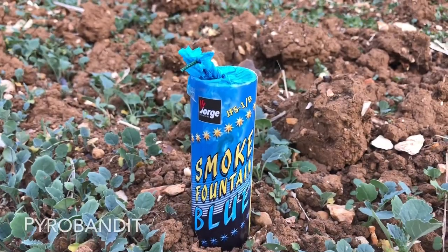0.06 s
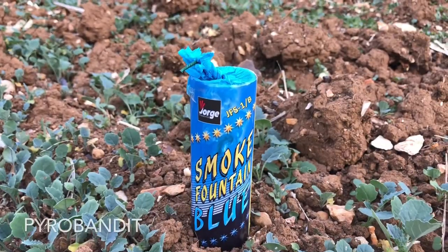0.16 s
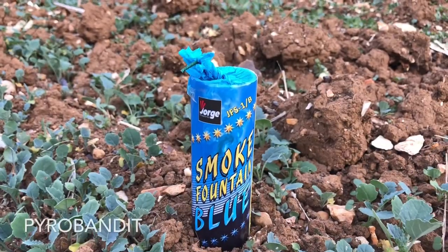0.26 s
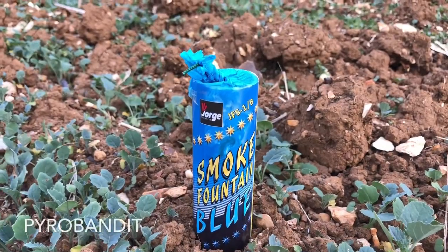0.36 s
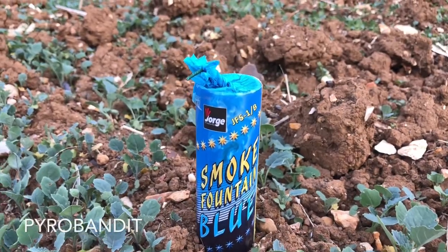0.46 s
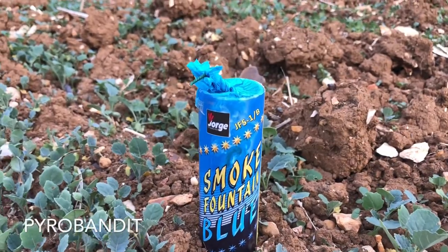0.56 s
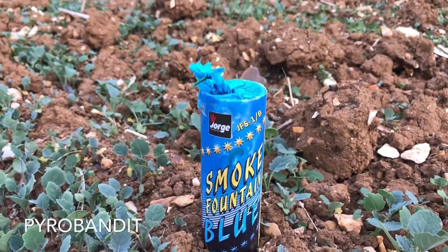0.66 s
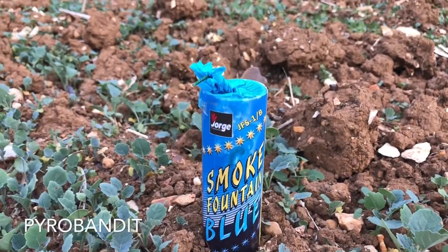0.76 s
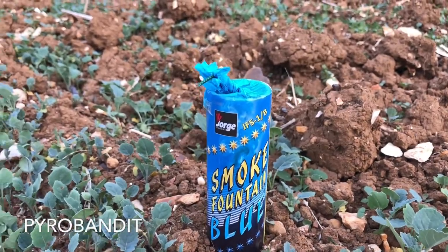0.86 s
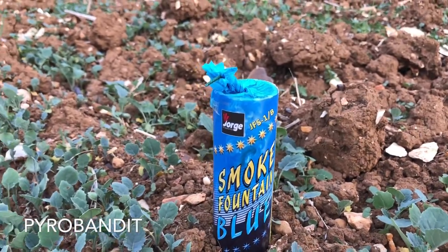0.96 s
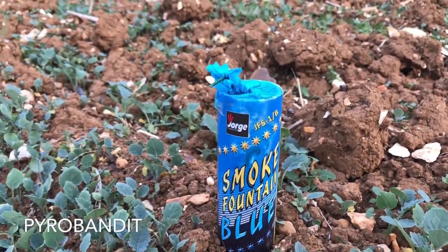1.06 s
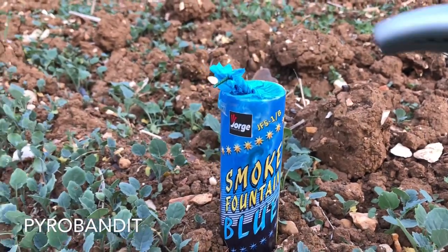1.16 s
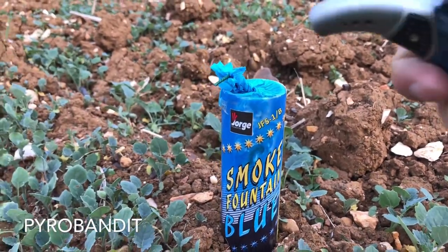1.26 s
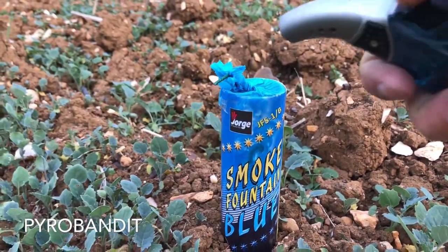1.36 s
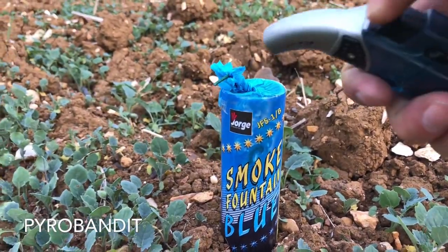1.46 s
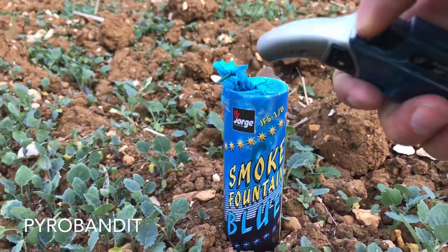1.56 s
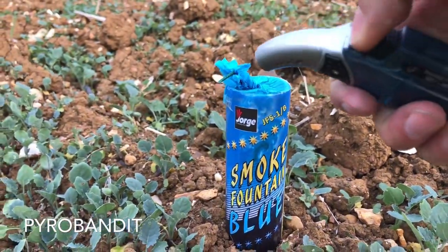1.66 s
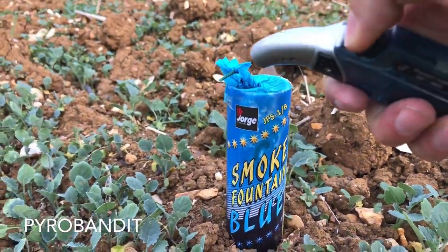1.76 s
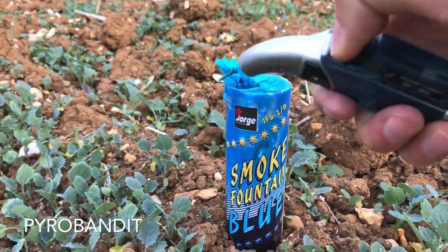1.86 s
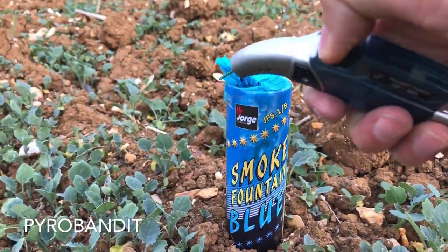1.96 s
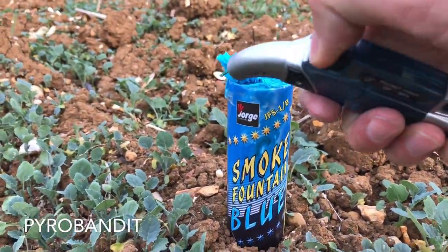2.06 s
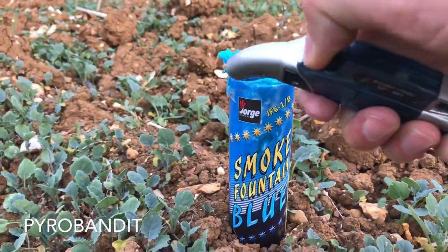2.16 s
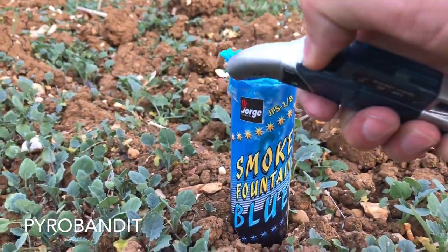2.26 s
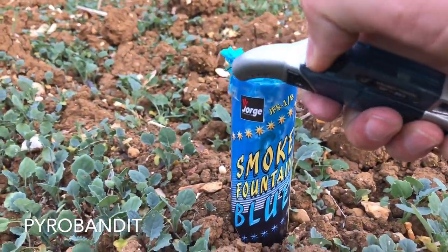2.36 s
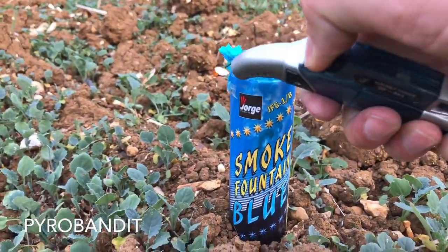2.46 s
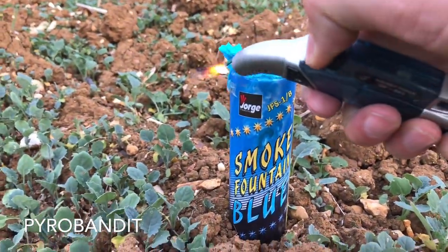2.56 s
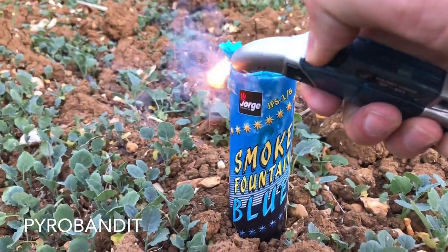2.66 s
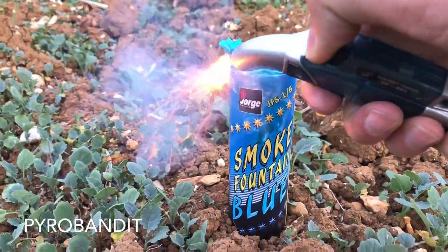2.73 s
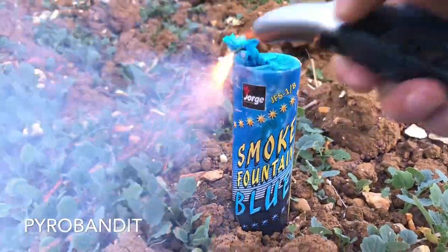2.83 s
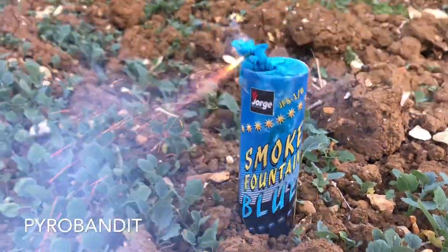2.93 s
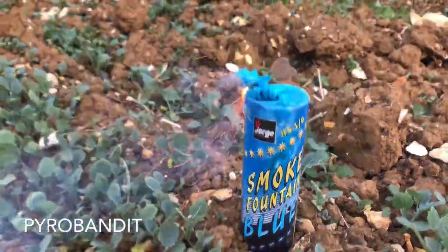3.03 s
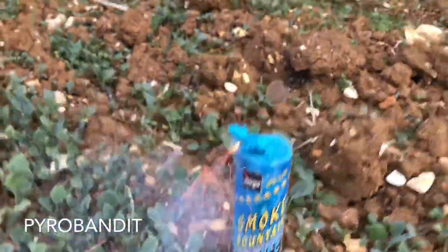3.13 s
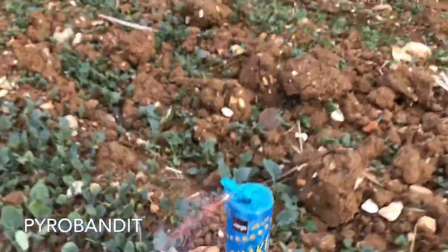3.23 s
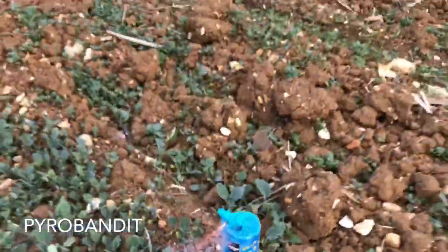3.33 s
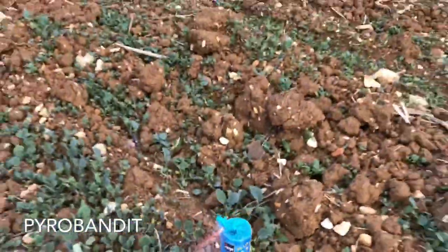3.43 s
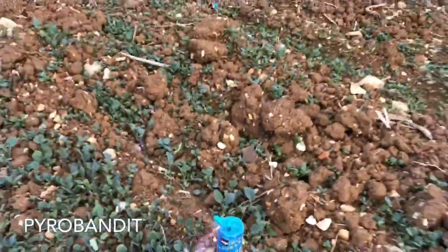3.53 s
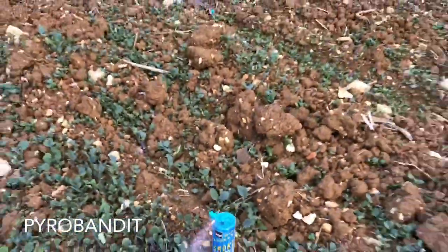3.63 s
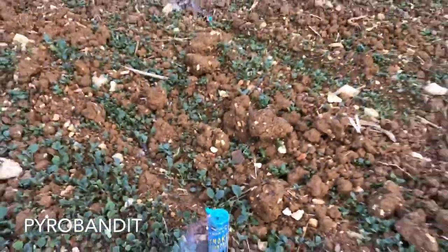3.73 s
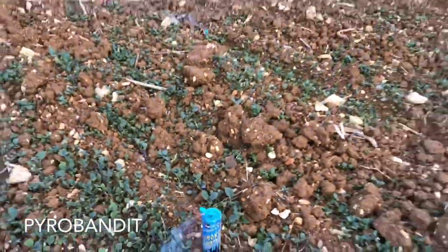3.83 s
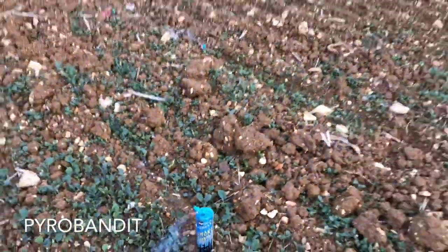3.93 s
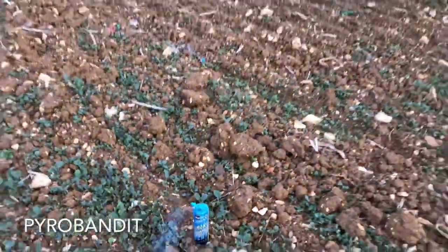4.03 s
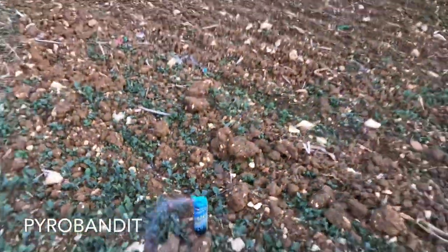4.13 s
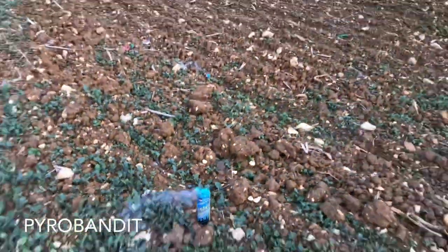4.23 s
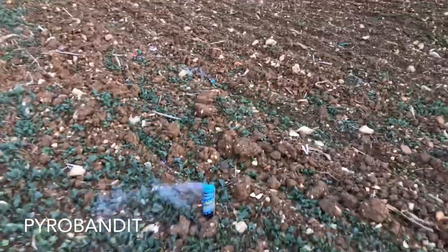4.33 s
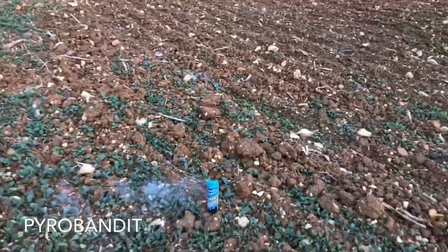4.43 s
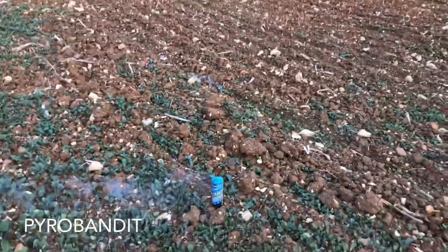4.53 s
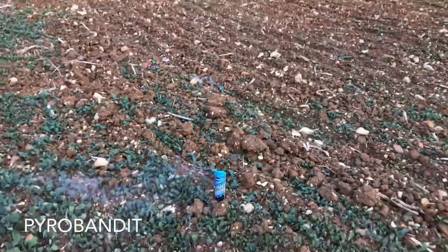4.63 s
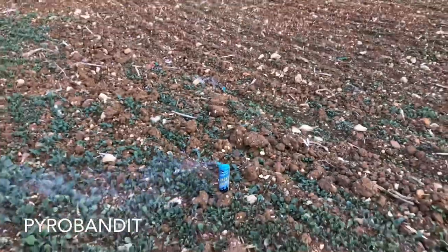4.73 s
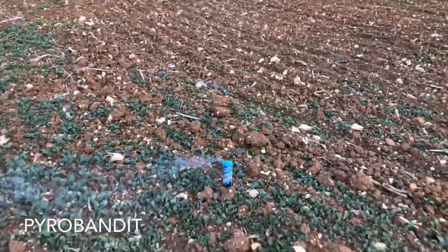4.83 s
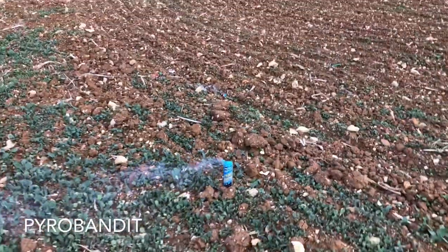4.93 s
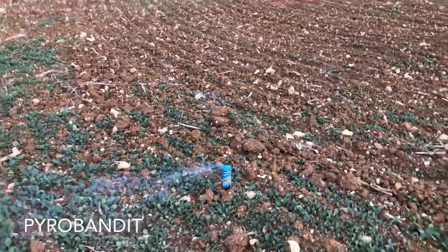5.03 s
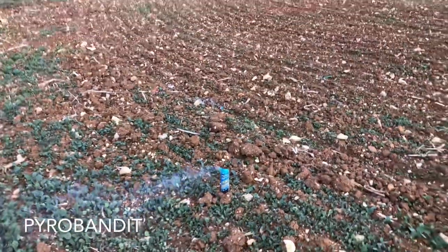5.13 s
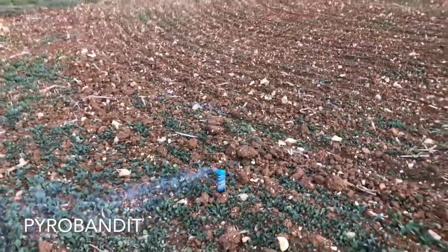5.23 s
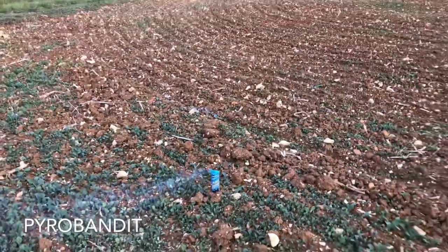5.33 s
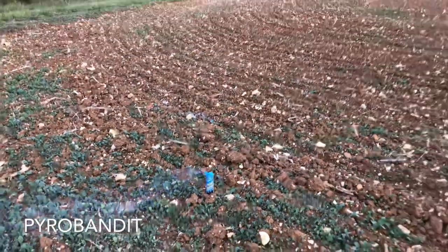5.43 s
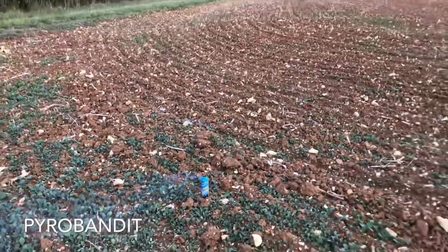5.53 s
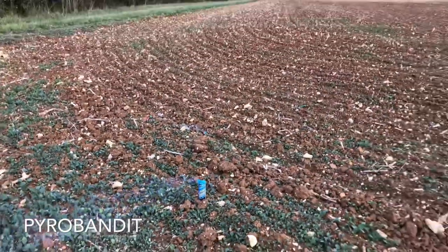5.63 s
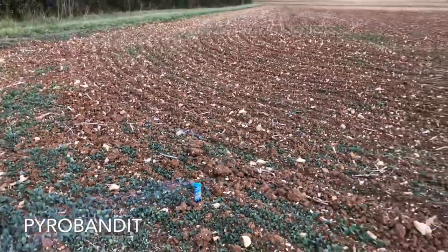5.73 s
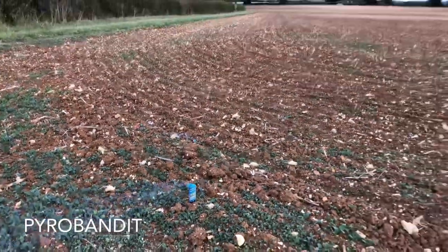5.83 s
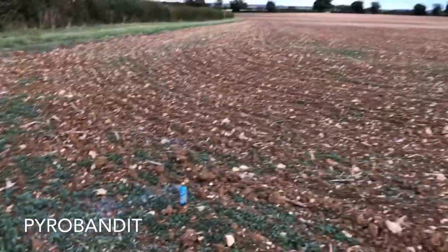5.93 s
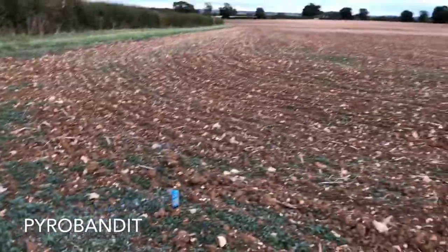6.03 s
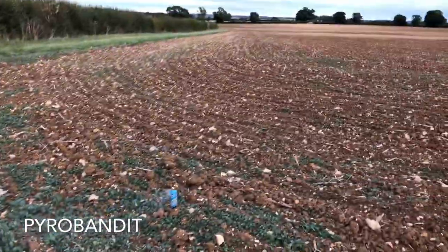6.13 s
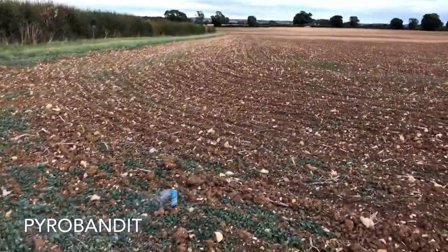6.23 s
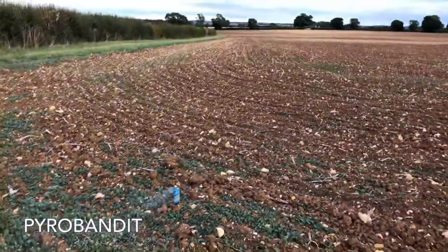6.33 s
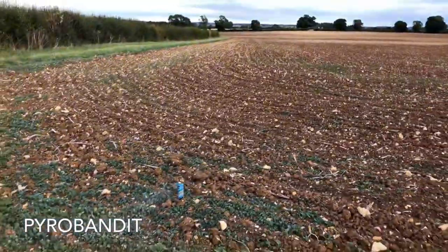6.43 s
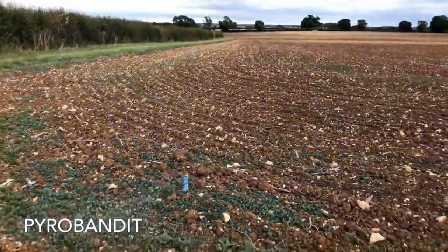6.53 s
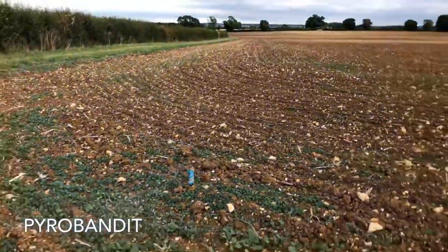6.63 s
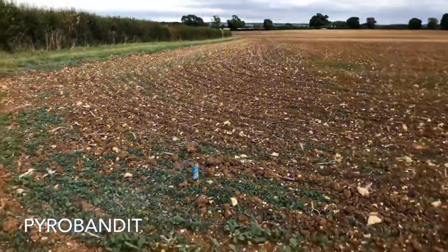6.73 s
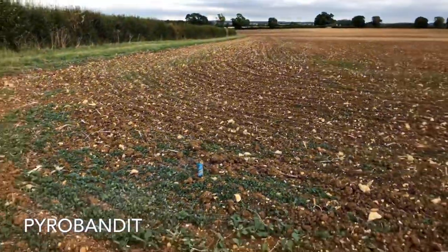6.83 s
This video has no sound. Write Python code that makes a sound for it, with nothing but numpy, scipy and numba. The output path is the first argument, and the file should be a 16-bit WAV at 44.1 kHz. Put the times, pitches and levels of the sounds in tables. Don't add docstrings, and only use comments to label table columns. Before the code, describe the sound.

In an open field, a torch lighter snaps alight, a firework fuse bursts into spitting hiss, then thins behind crunching retreating steps and gusty rumble.

```python
import sys
import numpy as np
from scipy import signal
from scipy.fft import rfft, irfft, next_fast_len
from scipy.io import wavfile
from scipy.ndimage import uniform_filter1d, map_coordinates
from numba import njit

SR = 44100
rng = np.random.default_rng(int(sys.argv[2]) if len(sys.argv) > 2 else 0)


def linear_from_db(decibels):
    return 10 ** (np.asarray(decibels, float) / 20)


def unload_wav(signal):
    wavfile.write(
        sys.argv[1],
        SR,
        np.round(np.clip(np.atleast_2d(signal).T, -1, 1) * 32767).astype(np.int16),
    )


N = 303804
T = np.arange(N) / SR


def curve(rows, fade_in=.005, fade_out=.01):
    s, *columns = np.transpose(rows)
    opening = np.clip((T - s[0]) / fade_in + 1, 0, 1)
    closing = np.clip((s[-1] - T) / fade_out + 1, 0, 1)
    return [opening * closing] + [np.interp(T, s, column) for column in columns]


def swells(rows):
    return sum(height * np.exp(-((T - s) / width) ** 2) for s, height, width in rows)


def walk(rate):
    hold = int(SR / rate)
    steps = np.repeat(rng.standard_normal(N // hold + 1), hold)
    return 1.35 * uniform_filter1d(uniform_filter1d(steps, hold), hold)[:N]


def grit(share, spread_db, size=16):
    strengths = np.minimum(rng.exponential(size=N // size + 1), 4)
    bursts = rng.standard_normal(N) * linear_from_db(spread_db * np.repeat(strengths, size)[:N])
    return (1 - share) * rng.standard_normal(N) + share * bursts / np.std(bursts)


def filtered(x, tone):
    size = next_fast_len(N)
    hz, db = np.transpose(tone)
    bins_hz = np.arange(size // 2 + 1) * SR / size
    gain = linear_from_db(np.interp(np.log(bins_hz + 1), np.log(hz), db, left=-90, right=-90))
    return irfft(rfft(x, size) * gain, size)[:N]


def colour(x, tone):
    y = filtered(x, tone)
    return y / np.std(y)


def add(out, s, grain):
    i = int(s * SR)
    out[i:i + len(grain)] += grain[:N - i]


def wavelets(rows, cycles, glide, rise):
    out = np.zeros(N)
    phases = rng.random(len(rows))
    for (s, db, hz), phase in zip(rows, phases):
        c = np.arange(int(8 * cycles * SR / hz)) * hz / SR
        shape = (1 - np.exp(-(c / rise) ** 2)) * np.exp(-c / cycles)
        sinking = np.log1p(glide * c) / glide * (1 + glide * rise)
        wave = np.sin(2 * np.pi * (phase + sinking))
        start_s = max(s - shape.argmax() / SR, 0)
        add(out, start_s, linear_from_db(db) * shape / shape.max() * wave)
    return out


def scatter(per_s, gain, hz, octaves, spread_db):
    slot = np.arange(400)
    when, size, pitch = rng.random((len(slot), 3)).T
    s = (slot + when) / per_s
    db = 20 * np.log10(np.interp(s, T, gain) + 1e-9) + spread_db * (2 * size - 1)
    rows = np.transpose([s, db, hz * 2 ** (octaves * (2 * pitch - 1))])
    return rows[(s < T[-1]) & (db > -75)]


def knock(modes, blows, treble_db=0):
    t = np.arange(SR // 40) / SR
    ring = np.zeros(len(t))
    for hz, db, t60 in modes:
        strength = linear_from_db(db + treble_db * np.log2(hz / 4000))
        ring += strength * np.sin(2 * np.pi * hz * t) * 1000. ** (-t / t60)
    ring = sum(size * np.roll(ring, int(ms * SR / 1000)) for ms, size in blows)
    ring = signal.sosfilt(signal.butter(5, 1450, "high", fs=SR, output="sos"), ring)
    return ring / np.abs(ring).max()


@njit
def notch(x, hz, depth, q):
    y, b, l = np.empty(len(x)), 0., 0.
    for i in range(len(x)):
        g = np.tan(np.pi * hz[i] / SR)
        v = (b + g * (x[i] - l)) / (1 + g * (g + 1 / q))
        b, l, y[i] = 2 * v - b, l + 2 * g * v, x[i] - depth[i] * v / q
    return y


def fuse():
    # time_s, level_db
    burning = [(2.56, -56), (2.65, -44), (2.87, -37), (3.03, -35.5), (3.26, -37), (3.54, -41.5),
               (3.76, -47.5), (3.85, -44.5), (4.19, -47.5), (4.32, -53), (4.51, -49), (4.8, -48.5),
               (4.96, -55.5), (5.48, -52.5), (6.04, -53), (6.32, -61.5), (6.5, -54), (6.889, -55)]
    # time_s, change_db, half_width_s
    flares = [(2.935, 5, 0.0079), (3.2, 0, 0.027), (3.575, -1.5, .03), (3.64, 4, 0.054), (3.95, -1, 0.04),
              (5.22, 2, 0.036), (5.55, -5, 0.032), (5.85, -3, 0.13), (3.46, 1.5, .06), (4.75, 1, .04),
              (6.3, 3, 0.066)]
    # pitch_hz, level_db (per Hz)
    roar_tone = [(120, -4), (250, -1.5), (700, -4.5), (1500, -1), (2600, -10.5), (5000, -32)]
    fizz_tone = [(900, -47), (1700, -6), (2500, -1), (3800, 0), (5500, -2), (7500, -6), (12000, -31)]
    spark_tone = [(4000, -16), (6500, -5), (8500, 0.5), (12000, 1), (15500, 3.5), (17000, -34)]
    on, fizz_db = curve(burning, fade_in=.05)
    torched = swells([(2.875, 1, 0.16)])
    in_tube = np.clip((T - 6.04) / 0.025 + 1, 0, 1)
    roar_db = -6 + 5 * torched
    spark_db = 1.5 - 8.5 * torched - 7 * in_tube
    sputter = walk(20.98) + 0.8 * walk(50)
    roar = linear_from_db(roar_db + 0.58 * sputter + 0.28 * walk(17)) * colour(grit(0.2, 6.6), roar_tone)
    fizz = linear_from_db(0.96 * sputter) * colour(grit(0.29, 1.9), fizz_tone)
    sparks = linear_from_db(spark_db + 1.26 * sputter) * colour(grit(0.29, 8.7), spark_tone)
    return on * linear_from_db(fizz_db + swells(flares)) * (roar + fizz + sparks)


def spits():
    # time_s, peak_db, pitch_hz
    cracks = [(1.301, -66, 3500), (1.715, -44, 4000), (1.799, -33, 800), (1.813, -36, 700),
              (1.817, -40, 7000), (1.8215, -36, 6500), (1.951, -32, 7000), (2.05, -45, 4000),
              (3.9973, -21, 8000), (3.9993, -18.5, 8500), (4.0095, -27, 6500), (4.0124, -30, 2470),
              (4.0172, -25, 6000), (4.0202, -27, 4500), (4.024, -17, 9000), (4.025, -35, 3500),
              (4.0374, -20, 5000), (4.0378, -10.5, 12300), (5.946, -37, 6500), (6.061, -40, 5960),
              (6.141, -41, 8960)]
    return wavelets(cracks, cycles=0.75, glide=0.032, rise=0.27)


def lighter_gas():
    # time_s, level_db
    jet_levels = [(1.645, -59), (1.671, -54), (1.771, -54), (1.79, -50)]
    # time_s, level_db
    flame_levels = [(1.812, -43.5), (1.9, -45.5), (2.286, -43.5), (2.502, -48), (2.6, -49)]
    # pitch_hz, level_db (per Hz)
    jet_tone = [(1470, -38), (2500, -13), (4140, -19), (4440, -14), (5350, -11), (5970, -12), (6860, -5),
                (8080, 3), (10400, -7), (16000, -5)]
    flame_tone = [(120, -7), (200, -3), (482, -7.5), (1500, -2.5), (3020, -7), (4040, -5), (4950, -10.5),
                  (8270, -18), (11500, -18.5), (14900, -16), (16000, -12)]
    flame_off_s = 2.925
    _, jet_db = curve(jet_levels)
    until_off = flame_levels + [(flame_off_s, flame_levels[-1][1])]
    lit, flame_db = curve(until_off, fade_in=0.004, fade_out=0.02)
    jet_on = curve([jet_levels[0], (1.8, 0)], fade_in=0.01, fade_out=0.0058)[0]
    jet = jet_on * linear_from_db(jet_db + 1.5 * walk(39.7))
    flame = lit * linear_from_db(flame_db + 1.43 + 1.9 * walk(60) + 0.3 * walk(16))
    return jet * colour(grit(0.08, 3.1), jet_tone) + flame * colour(grit(0.3, 6.2), flame_tone)


def shade(fire):
    # time_s, centre_hz, depth (0 to 1, negative lifts)
    hand = [(1.64, 10500, 0.7), (1.85, 10700, 0.8), (2.0, 10900, 0.76), (2.3, 12300, 0.56),
            (2.45, 11500, 0.2), (2.62, 12200, 0.75), (2.76, 10300, 0.1), (2.92, 9600, 0.55),
            (3.02, 8550, 0)]
    narrow_dip = [(1.82, 4480, 1), (2.2, 5030, 0.6), (2.5, 5730, 0.8), (2.75, 5200, 0.5), (3.1, 5100, 0),
                  (3.3, 4140, 0.1), (3.5, 3950, 0.25), (4.1, 4150, 0.3), (4.4, 4560, 0)]
    mouth = [(1.9, 2900, 0.66), (2.4, 3250, 0.15), (2.8, 3200, 0.4), (2.95, 4200, -0.15), (3.15, 4100, 0),
             (4.9, 3400, 0.12), (5.4, 3387, -0.5), (6.89, 3600, -0.95)]
    for band, sharpness in ((hand, 2.1), (narrow_dip, 6.5), (mouth, 5.5)):
        present, hz, depth = curve(band, fade_out=0.076)
        fire = notch(fire, np.clip(hz, 100, .45 * SR), present * np.clip(depth, -2, 1), sharpness)
    return fire


def over_ground(x):
    # time_s, extra_delay_ms, strength (-1 to 1)
    bounce = [(1.6, .6, .5), (1.9, .56, .55), (2.2, .52, .55), (2.6, .46, .6), (2.8, .46, .6),
              (3.0, .45, .45), (3.2, .5, .5), (3.4, .57, .5), (4.0, .57, .4), (4.2, .57, .6),
              (4.35, .53, .8), (4.6, .49, .65), (5.0, .432, .8), (5.4, .418, .8), (5.7, .4, .8),
              (6.0, .39, .7), (6.1, .385, .15), (6.89, .35, .15)]
    # pitch_hz, level_db
    soil_tone = [(1200, -22), (3300, -13), (4400, -4), (5600, -2), (8000, -3), (11000, -5), (16000, -9)]
    _, delay_ms, strength = curve(bounce)
    soil = filtered(x, soil_tone)
    for path, share in ((1, 0.47), (0.68, 0.2), (1.9, .25)):
        tremble = 1 + .012 * walk(9)
        delay = path * tremble * delay_ms * SR / 1000
        late = map_coordinates(soil, [np.arange(N) - delay], order=3)
        x = x + share * np.clip(strength * linear_from_db(2.5 * walk(6.06)), -.95, .95) * late
    return x


def trigger():
    # time_s, peak_db, treble_db (per octave)
    clicks = [
        (1.7739, -35, 1),
        (1.787, -42, -3),
        (1.7974, -2.2, 0.8),
        (2.9248, -14, 1),
    ]
    # pitch_hz, level_db, t60_s (time to die by 60 dB)
    shell = [(1650, -7, 0.011), (2050, -8, 0.007), (3100, -9, 0.005), (4400, 3, 0.007), (5400, -5, 0.004),
             (6570, 2, 0.0038), (8400, -9, 0.0033), (9600, -15, 0.0025), (11300, -10, 0.003),
             (12900, -17, .002), (14800, -20, .002)]
    latch = [(1570, 6.5, 0.006), (2900, -5, 0.0032), (3840, -1, 0.0044), (5130, -16, 0.013),
             (6500, -5, 0.0091), (9900, -15, .02), (11500, -9, 0.0039), (14000, -22, 0.003)]
    out = np.zeros(N)
    add(out, 1.4698, linear_from_db(-32) * knock(latch, [(0, 0.55), (.4, 0.58), (1.05, .6)]))
    blows = [(.08, 0.19), (.25, 0.16), (.5, -1), (1.1, -0.7), (1.75, .12)]  # (ms, size)
    for s, db, treble_db in clicks:
        add(out, s, linear_from_db(db) * knock(shell, blows, treble_db))
    return out


def puffs():
    catching = linear_from_db(-38) * (T > 2.76) * (T < 3.17)
    chance = scatter(41, catching, hz=233, octaves=.2, spread_db=3.1)
    return wavelets(chance, cycles=0.28, glide=0.53, rise=1.0)


def feet():
    # start_s, length_s, level_db
    presses = [(3.998, 0.3, -56.5), (4.664, 0.14, -48), (4.814, 0.11, -51.5), (5.2, 0.065, -48.5),
               (5.3, 0.14, -51.5), (5.535, 0.1, -50), (5.779, 0.049, -42), (5.851, 0.0623, -45.5),
               (6.1, 0.055, -55), (6.582, 0.039, -56), (6.778, 0.083, -56)]
    # time_s, peak_db, pitch_hz
    clods = [(3.982, -43, 484), (4.029, -43, 487), (4.038, -35, 338), (4.056, -39, 345), (4.079, -36, 350),
             (4.251, -42.5, 541), (4.665, -29.5, 490), (4.672, -34, 222), (4.696, -34, 456),
             (4.747, -34, 377), (4.757, -34, 357), (4.776, -39, 373), (4.832, -41, 333), (4.894, -41, 476),
             (5.214, -43, 339), (5.302, -35, 301), (5.317, -40, 404), (5.398, -40, 420), (5.549, -43, 474),
             (5.593, -40, 780), (5.609, -42, 335), (5.778, -37, 810), (5.804, -33, 325), (5.85, -45, 443),
             (5.869, -35.5, 387), (5.89, -48, 420), (6.157, -41, 602), (6.579, -36, 420)]
    # pitch_hz, level_db (per Hz)
    crunch_tone = [(90, -16), (180, -11), (330, -2.5), (550, -4.5), (900, -7.5), (2800, -17)]
    heel_s, lift_s, settle_db = .01, 0.035, -7
    weight = np.zeros(N)
    for s, length, db in presses:
        on, press_db = curve([(s, db), (s + length, db + settle_db)], heel_s, lift_s)
        weight += on * linear_from_db(press_db)
    crumble = weight * linear_from_db(3.1 * walk(70)) * colour(grit(0.72, 2.0, size=128), crunch_tone)
    crumbs = scatter(60, weight * linear_from_db(4.5), hz=517, octaves=.7, spread_db=8.8)
    cracks = wavelets(np.vstack([clods, crumbs]), cycles=0.76, glide=0.6, rise=0.58)
    return linear_from_db(-2) * crumble + cracks


def wind():
    # time_s, level_db
    breeze = [(0, -45.5), (1.9, -63.5), (2.4, -60), (2.84, -51), (3.6, -49.5), (3.95, -56.5), (5.1, -55),
              (5.5, -46), (5.75, -60), (6.45, -56), (6.89, -49)]
    # time_s, peak_db, half_width_s
    gusts = [(0, -33, 0.01), (.1, -43, 0.033), (.2, -38, 0.026), (.66, -45.5, 0.12), (.96, -39, 0.049),
             (1.08, -39, 0.048), (1.26, -42.5, 0.045), (1.58, -52, 0.038), (1.74, -42.5, 0.29),
             (1.87, -50, 0.034), (2.28, -45, 0.047), (3.25, -45, 0.074), (3.4, -49, 0.04),
             (3.52, -33.5, 0.04), (3.66, -44, .05), (3.84, -47.5, 0.036), (4.05, -54, .06),
             (4.68, -52, 0.046), (4.82, -52, 0.071), (5.22, -44.5, 0.017), (5.58, -58, 0.042),
             (5.88, -46, 0.05), (6.3, -41.5, 0.028), (6.54, -42, 0.053), (6.83, -35, 0.047)]
    # time_s, peak_db, pitch_hz
    eddies = [(0.111, -34.5, 146), (0.129, -34.5, 147), (0.2, -35, 93), (0.649, -34, 127),
              (0.726, -34.5, 90.5), (0.869, -40, 103), (0.954, -28, 99), (1.025, -35, 85), (1.064, -31, 66),
              (1.092, -30.5, 138), (1.263, -38, 150), (1.57, -32.5, 90), (1.636, -33, 109),
              (1.71, -32.5, 113), (1.764, -36, 79), (2.109, -36.5, 116), (2.305, -34, 145),
              (3.232, -31, 182), (3.254, -30, 180), (3.344, -32, 96), (3.425, -33, 105), (3.503, -23, 201),
              (3.65, -30, 139), (3.703, -34, 177), (6.546, -37, 91), (6.591, -30, 197), (6.744, -38, 197),
              (6.793, -34, 140), (6.831, -25, 111), (6.862, -27, 133.6)]
    # pitch_hz, level_db (per Hz)
    wind_tone = [(12, -30), (20, -16), (53, 6), (107, -0.5), (304, -11.5), (380, -27), (435, -23.5),
                 (505, -31), (700, -54), (910, -62), (1540, -120)]
    flow = linear_from_db(curve(breeze)[1]) + swells([(s, linear_from_db(db), width) for s, db, width in gusts])
    rumble = flow * linear_from_db(-9 + 4.1 * walk(22)) * colour(rng.standard_normal(N), wind_tone)
    swirls = scatter(23, flow * linear_from_db(1), hz=124, octaves=0.4, spread_db=5.9)
    return rumble + wavelets(np.vstack([eddies, swirls]), cycles=0.49, glide=1.0, rise=0.63)


def sleeve():
    # time_s, peak_db, half_width_s
    rubs = [(1.094, -70, 0.078), (1.235, -70, .02), (1.3, -70, .015), (1.36, -69.5, 0.067)]
    cloth_tone = [(1500, 3), (3000, -5), (9000, -11), (16000, -20)]  # (Hz, dB per Hz)
    rub = swells([(s, linear_from_db(db), width) for s, db, width in rubs])
    return rub * colour(grit(.6, 4.1), cloth_tone)


def bird():
    # start_s, length_s, pitch_hz, level_db
    calls = [(.25, 0.28, 1520, -76), (1.085, 0.091, 1515, -70), (1.317, 0.11, 1550, -68)]
    waver = np.cumsum(25 * walk(30)) / SR
    out = np.zeros(N)
    for s, length, hz, db in calls:
        swell = np.sin(np.pi * np.clip((T - s) / length, 0, 1))
        out += linear_from_db(db) * swell * np.sin(2 * np.pi * (hz * T + waver))
    return out


def field():
    # pitch_hz, level_db (per Hz)
    hum_tone = [(59, -39), (100, -8.5), (350, -15), (471, -16.5), (691, -21.5), (1520, -24), (2860, -32.5),
                (5530, -33.5), (10500, -41.5), (15000, -42.5), (16000, -38)]
    return linear_from_db(-64 + 0.2 * walk(3.25)) * colour(rng.standard_normal(N), hum_tone)


def scene():
    fire = shade(lighter_gas() + fuse()) + spits()
    mono = over_ground(fire) + trigger() + puffs() + feet() + wind() + sleeve() + bird() + field()
    return np.array([mono, mono])


def top_cut(x):
    return signal.sosfilt(signal.butter(12, 16980, fs=SR, output="sos"), x)


def record(dry):
    x = signal.sosfilt(signal.butter(3, 40, "high", fs=SR, output="sos"), dry)
    x = signal.sosfilt(signal.ellip(10, .3, 45, 15800, fs=SR, output="sos"), x)
    return top_cut(x)


dry = scene()
out = record(dry)
unload_wav(out)
```